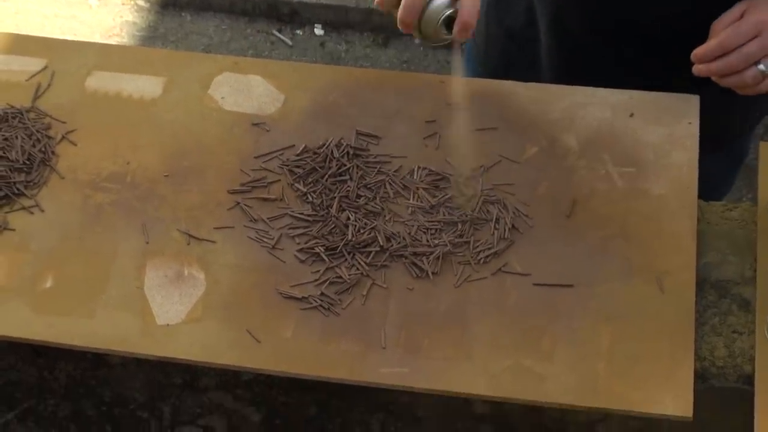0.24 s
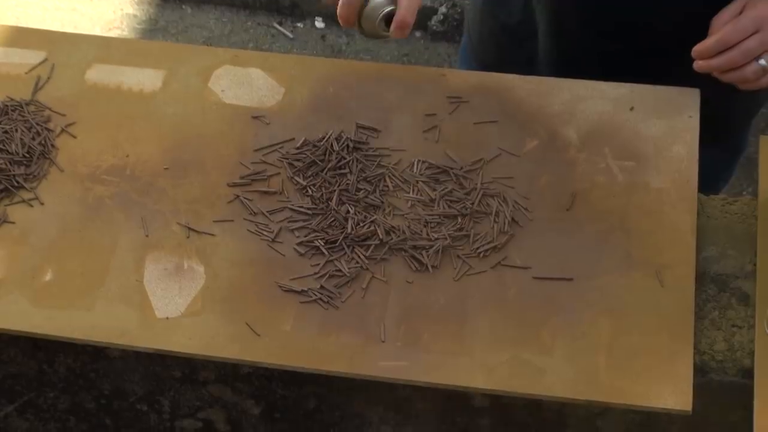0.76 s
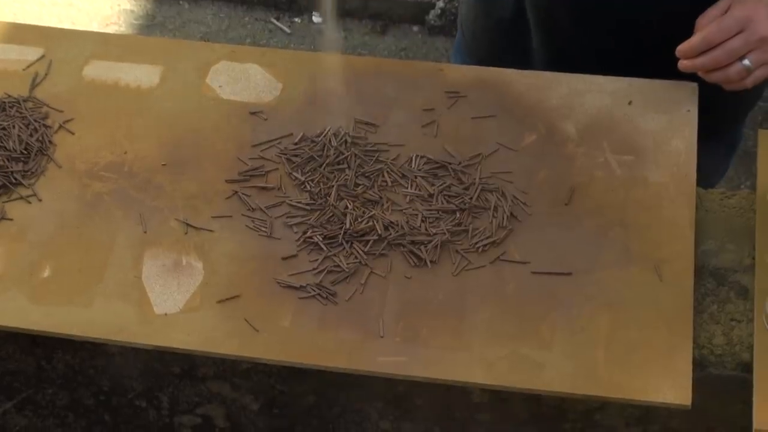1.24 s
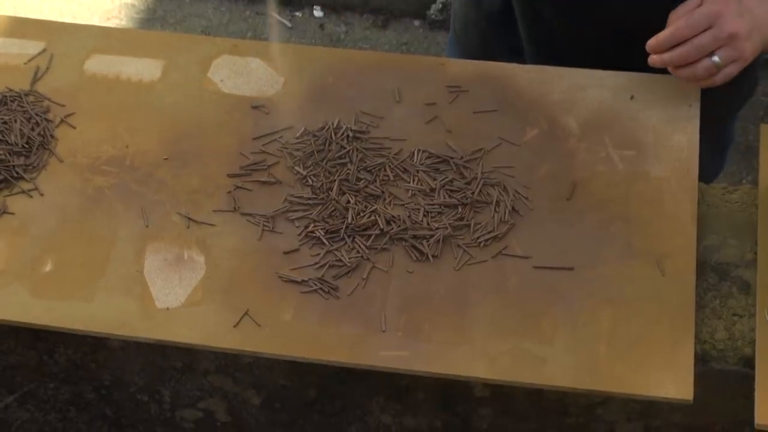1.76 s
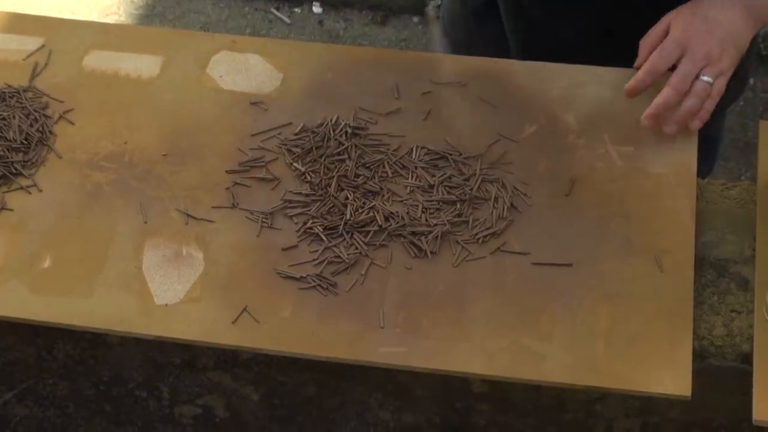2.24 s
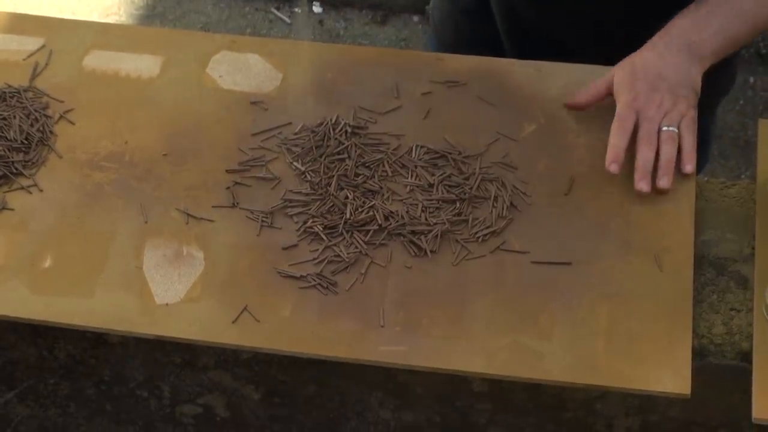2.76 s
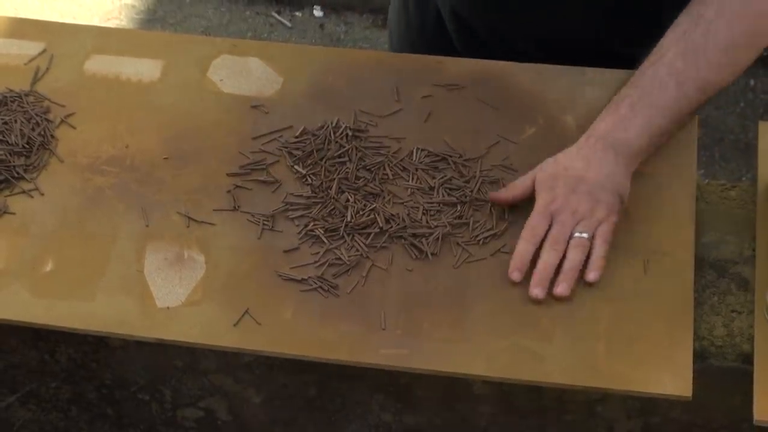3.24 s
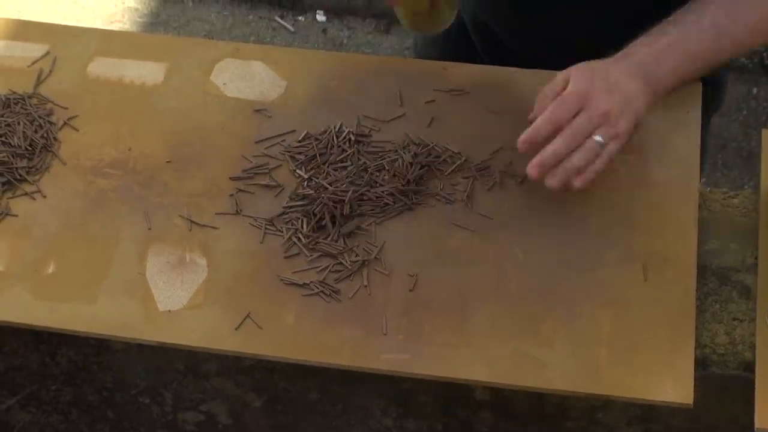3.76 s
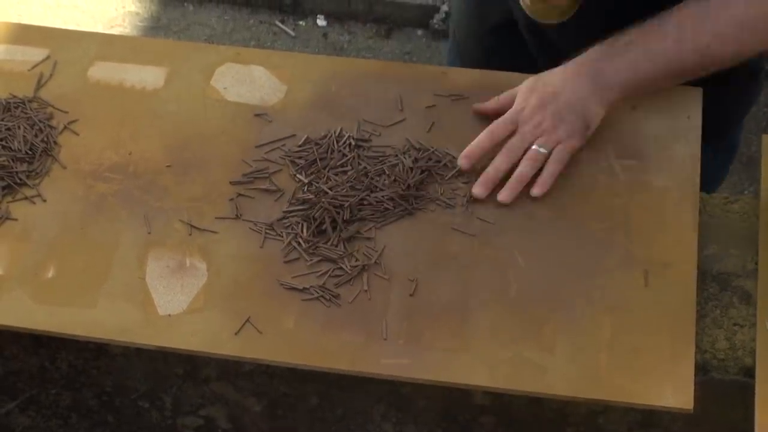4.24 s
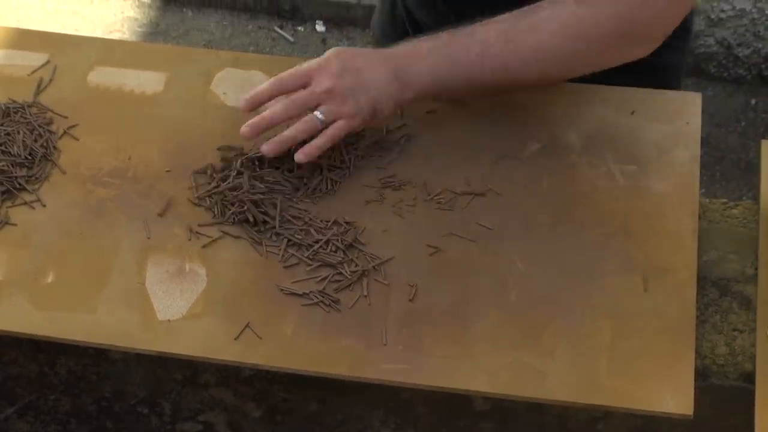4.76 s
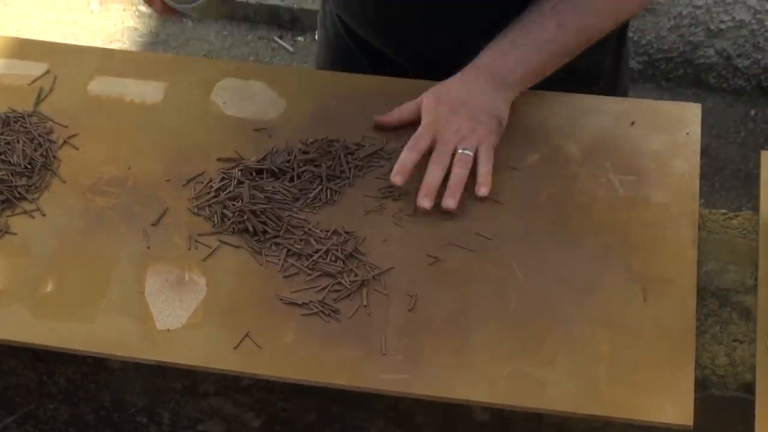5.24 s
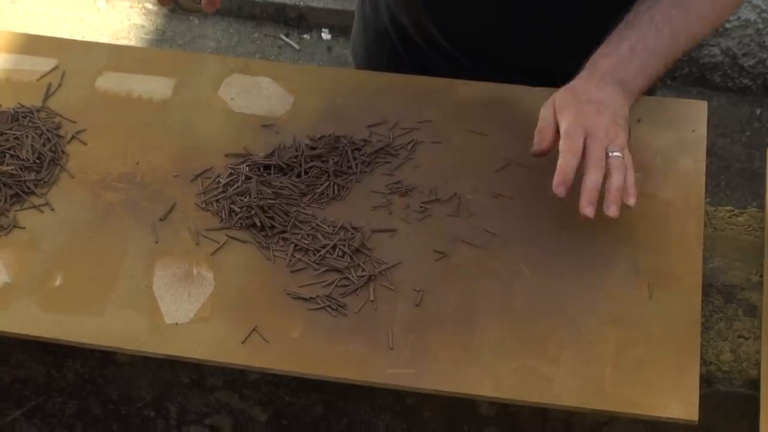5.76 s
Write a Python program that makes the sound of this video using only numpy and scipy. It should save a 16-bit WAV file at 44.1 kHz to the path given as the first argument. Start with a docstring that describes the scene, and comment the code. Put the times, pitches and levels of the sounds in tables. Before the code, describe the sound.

Short hissing aerosol bursts outdoors, then a spray can rattles with its metallic mixing ball while dry twigs are brushed across a board.

```python
"""An open yard outdoors: close to the microphone a paint can sprays short bursts over dry twigs on a board.
The spray is shaped noise, combed by echoes from the board; clots spit through the nozzle as short pops.
The can is tipped and shaken: its ball knocks decaying modes out of the wall and scrapes them as it rolls.
A hand sweeps the twigs together, in grainy noise with small snaps, and its palm rubs the board.
Far off, a street washes, with an engine tone in about the first half; a noise gate fades the pauses."""
import sys
import numpy as np
from scipy import signal
from scipy.fft import rfft, irfft
from scipy.io import wavfile
from scipy.ndimage import uniform_filter1d, map_coordinates

SR = 44100
rng = np.random.default_rng(int(sys.argv[2]) if len(sys.argv) > 2 else 0)


def transcribe(u):
    """Save the signal u as a 16-bit wav file named by the first command-line argument.

    u: samples, shape (n,) or (channels, n), limited to [-1, 1]; the rate is SR.
    q: integer samples, one column per channel.
    """
    v = np.clip(np.atleast_2d(u).T, -1, 1)
    q = np.round(v * 32767).astype(np.int16)
    wavfile.write(sys.argv[1], SR, q)


N = 264319  # length [samples]
TIME = np.arange(N) / SR  # [s]

# Levels in the tables of strokes and blows are relative: each source has its own trim in the mix.

# far street, level over time: start_s, level_db
STREET_LEVEL = [(0, -51), (.15, -57.5), (.45, -48), (.85, -54), (1.1, -49), (1.9, -49), (2.3, -48),
                (2.8, -49), (3.05, -61.5), (3.4, -65), (3.55, -48.5), (3.8, -55.5), (4.4, -56), (5.99, -48)]
# far street, spectrum: frequency_hz, density_db (per Hz)
STREET_SPECTRUM = [(25, -25), (50, -27), (90, -20), (125, -17), (150, -7.5), (180, 0.5), (320, 0),
                   (490, -5), (600, -17), (1000, -17.5), (2000, -27), (5000, -30), (16000, -48)]
# far engine pulling through its gears: start_s, firing_hz, level_db, half_order_db (over the firing tone)
ENGINE_GEARS = [(0, 215.8, -51.5, -14), (.35, 180, -57, -33), (.7, 215, -50, -19), (1.1, 172, -56.5, -21),
                (1.45, 180, -47, -10), (1.6, 206.5, -49.5, -17), (1.93, 220.3, -50, -19.5),
                (2.1, 170, -53.5, -12.5), (2.33, 176.6, -45, -13.5), (2.5, 206, -53, -17),
                (2.68, 203.5, -56.5, 4.5), (2.8, 209, -48, -23), (2.95, 205, -84, -15)]

# board under the twigs, spectrum: frequency_hz, density_db (per Hz)
BOARD_SPECTRUM = [(120, -39.5), (220, -5), (440, 1), (600, -5), (850, -0.5), (1300, -7.5), (2500, -34.5)]
# the hand leans on the heap: start_s, length_s, rise_s, sag_db_per_s, level_db
LEANS = [(3.4, 0.092, .06, 24, -37.5), (4.42, 0.18, 0.26, 9, -35.5)]
# skin on wood, spectrum: frequency_hz, density_db (per Hz)
PALM_SPECTRUM = [(60, -34), (200, 0), (450, -2), (1400, 4), (2300, -1), (3500, 3.5), (4300, 5),
                 (5900, -3.5), (6600, -12.5), (9500, -16), (11000, -27.5), (16000, -33)]
# the palm slides over the board: start_s, length_s, rise_s, sag_db_per_s, level_db
PALM_SLIDES = [(4.303, 0.099, 0.042, 49, -38), (4.41, .05, 0.061, 5.5, -28.5),
               (5.133, 0.13, 0.0038, -2.5, -60), (5.3, 0.16, 0.027, 93, -48)]
# dry twigs, spectrum: frequency_hz, density_db (per Hz)
TWIG_SPECTRUM = [(76, -59), (130, -40), (228, -9), (394, -10.5), (453, -3), (501, -13), (589, -5),
                 (638, -7.5), (1400, -3.5), (2270, -4.5), (4780, -2.5), (9670, -9.5), (12800, -17.5),
                 (15100, -16), (16000, -29)]
# the hand pushes the twigs: start_s, length_s, rise_s, sag_db_per_s, level_db, brightness_db_per_octave
TWIG_SWEEPS = [(3.19, .19, 0.012, 16, -61.5, 1), (3.385, 0.19, 0.0045, 32, -32, 0),
               (4.38, 0.29, 0.16, 14.5, -34.5, -0.63), (5.235, 0.094, 0.082, 110, -37.5, -0.56)]
DULLING = 0.1  # slower twigs sound duller: dB an octave per dB under the stroke's peak
SETTLE_PER_S, SETTLE_DB = 82, -10  # stray twigs that drop into place: rate, level before the push shapes it

# wall of the can, its modes: frequency_hz, level_db, free_t60_s (before the hand's grip shortens it)
CAN_MODES = [(1474, 3, 0.036), (1750, -4.5, .025), (2067, 4.5, .06), (2190, -6, .04), (2300, -1.5, 0.27),
             (3525, 1.5, 0.28), (4180, 1, .03), (4170, -15, .04), (4860, 2.5, .04), (5100, -21.5, 0.029),
             (5860, -5, 0.017), (6310, -2, 0.14), (6970, 1.5, .04), (7280, -1.5, .04), (7970, -11, 0.028),
             (9030, 2.5, 0.075), (9990, -10.5, 0.3)]
DAMPING_DB_PER_S = 448  # extra decay of every mode under the gripping hand
DETUNE, RING_TILT_DB = .02, -1  # spread of the modes from strike to strike; their tilt in dB an octave
# paint sloshing in the tipped can loads the wall: start_s, mode_factor (on frequency), treble_edge_hz
PAINT_LOAD = [(1.5, 0.81, 15000), (2.25, 0.99, 15000), (2.83, 1.02, 11500), (2.93, 0.98, 8500),
              (3.16, 0.94, 8500), (3.37, 1.045, 10900), (3.5, 1.02, 11600), (3.8, 1.003, 9600),
              (3.92, 1, 9000), (4.08, 0.99, 8120)]
# the ball rolls along the wall: start_s, length_s, rise_s, sag_db_per_s, level_db, brightness_db_per_octave
BALL_ROLLS = [(.09, 0.1, 0.022, 5, -52.5, -5), (1.39, 0.049, 0.01, 3, -36.5, -11),
              (3.14, 0.16, 0.02, 30.5, -39.5, -13.5), (3.29, .095, .09, 5, -34, -8.5),
              (3.63, 0.25, 0.014, 32.5, -35.5, -8), (3.91, 0.15, .005, 17, -43.5, -2),
              (4.1, 0.25, .01, 113, -51.5, -2), (5.208, 0.15, 0.02, 4.5, -47.5, -1.5)]
ROLL_WIDTH = 0.023  # half width of a scraped mode, as a share of its frequency
# the ball strikes the can, and at 2.07 s the valve clicks: start_s, crack_peak_db, body_db, # low_band_db and
# high_band_db (over the body), ping_hz (strongest note)
BALL_KNOCKS = [(1.5269, -9.5, -56.5, 24, 14, 1340), (1.5477, -9, -42.5, 15.5, 8, 1308),
               (1.695, -17.5, -54.5, 2, -2, 4260), (1.7501, -14.5, -39, 4, -5, 4170),
               (2.0697, -33, -47.5, 13, 14.5, 7400), (2.2409, -11.5, -37.5, 2, 2, 7120),
               (2.2695, -16.5, -45.5, 10, 5, 1572), (2.289, -17, -40, 5, 3, 1670),
               (2.7781, -12, -41, 3.5, 0, 1670), (2.8065, -14, -32.5, 1.5, 7, 1580),
               (2.8238, 5.5, -37, 0.5, 7, 6380), (2.9203, -8, -44, 8, 2, 1726),
               (2.9447, -11.5, -36.5, 3, -7, 1700), (2.9627, -10.5, -35, 4.5, 4, 1690),
               (3.1594, -13.5, -48.5, 5, 4, 1730), (3.3877, 0.5, -22.5, 2, -5, 2010),
               (3.3989, 0, -26.5, -2.5, 4.5, 6820), (3.4064, -1.5, -22.5, -2.5, 1, 3720),
               (3.4204, -4.5, -27, 1, -11.5, 2010), (3.4562, -14.5, -22, 3, 1.5, 3596),
               (3.5005, -0.5, -26, 3.5, 2.5, 1960), (3.5543, -26, -19.5, 2.5, -3, 2027),
               (3.5664, -4, -24, 2.5, -10.5, 2077), (3.639, -14.5, -31.5, 4.5, -14.5, 1990),
               (3.6575, -11, -32, 2, 4.5, 2420), (3.6713, -6.5, -28, 1, 4, 6900),
               (3.7074, -18, -33, 5, 2.5, 2014), (3.7389, -18, -42, 6, 6, 2030),
               (3.7628, -28, -31, 1.5, -7.5, 2040), (3.7988, -16, -43.5, -4, 1.5, 2130),
               (3.91, -19, -31.5, -4, 7.5, 2140), (3.9314, -38, -32, -1, 3.5, 2160),
               (4.0776, -10, -27, -3, 6.5, 1953), (4.1154, -17.5, -40, -6, -2, 1970),
               (5.2114, -41, -49.5, -19, 9, 6370), (5.241, -29, -42, -14, -3, 6360)]
# crack of a strike, spectrum: frequency_hz, density_db (per Hz)
CRACK_SPECTRUM = [(40, -46), (200, -30.5), (800, 5), (1900, -6.5), (3600, 0), (7000, 4), (10000, -3),
                  (12000, -8.5), (16000, -16.5)]
REBOUND_S, REBOUND_DB, RING_DB = .012, -7.5, 0  # longest hop, its level; the modes over the clatter

# a clot spits: start_s, crack_peak_db, body_db, low_band_db and high_band_db (over the body)
NOZZLE_SPITS = [(0.9582, -2.5, -13, -26, -10), (0.9864, -21, -31.5, 10, 7), (1.2343, -9, -13, -18, -17.5),
                (5.8561, -23, -28.5, 8.5, 21)]
# spitting nozzle, spectrum: frequency_hz, density_db (per Hz)
SPIT_SPECTRUM = [(300, -27), (1000, -26.5), (1800, -19.5), (2400, -22), (3200, -6), (4200, 7.5),
                 (5300, 0.5), (6700, 6.5), (8000, -6.5), (12000, -2.5), (16000, -15)]
# presses of the valve: start_s, length_s, rise_s, sag_db_per_s, jet_db,
# then over the jet: low_treble_db, cap_resonance_db, mist_on_board_db
VALVE_BURSTS = [(0.0, 0.056, 0.00067, 66, -30.5, 6, 2, -11.5), (.219, 0.14, 0.076, 65, -27, -.5, -6, -13),
                (.446, 0.15, 0.083, 68, -28, -1.5, -5, -16), (.636, .15, 0.071, 58, -30.5, -0.5, -2, -17.5),
                (.826, 0.16, 0.12, 45, -30.5, -0.5, -1, -12), (1.04, .15, 0.081, 67, -33, 4, 3, -9.5),
                (1.25, 0.24, 0.078, 57, -30.5, -2, -1.5, -11.5),
                (1.5, .157, 0.062, 81, -32, 6.5, -0.5, -5.5), (1.697, 0.036, .002, 150, -44, 6, 0, 3),
                (1.73, 0.11, 0.051, 86, -34.5, 7.5, 0.5, -2), (2.069, 0.16, 0.055, 128, -31.5, 2, -1, -4.5),
                (2.25, 0.17, 0.097, 105, -43, 13, 10.5, 4.5), (2.505, 0.14, 0.089, 62, -33.5, 0, -3.5, -29),
                (2.672, 0.19, 0.086, -10, -40.5, 6.5, -3.5, -37),
                (2.9, 0.29, 0.11, 47, -28, 0.5, -6, -13.5), (5.589, 0.14, 0.11, 1, -33.5, -2, -9.5, -24),
                (5.81, .15, 0.11, 130, -27.5, 3, -5.5, -12)]
# echo of the board, following the height of the can: start_s, lag_ms
BOARD_LAG = [(0, 1.03), (.06, 1.07), (.22, 0.98), (.43, 0.96), (.54, 1.1), (.72, 1.05), (.85, 1.11),
             (.97, 1.12), (1.2, 1), (1.3, 0.99), (1.75, 0.97), (1.85, 0.96), (2.07, 0.845), (2.26, 0.83),
             (2.42, 0.97), (2.66, 1.23), (3.12, 1.05), (5.66, 0.93), (5.96, 1.25)]
# nozzle jet, spectrum: frequency_hz, density_db (per Hz)
JET_SPECTRUM = [(4300, -32.5), (5400, -7.5), (6700, -2), (7400, -5), (8200, -0.5), (9000, -9.5),
                (10200, 1.5), (11500, 3.5), (13000, 5), (14500, 4), (15800, -2.5)]
# resonance of the nozzle cap, spectrum: frequency_hz, density_db (per Hz)
CAP_SPECTRUM = [(2350, -39), (2600, -13), (2950, -6), (3350, 1), (3700, -1.5), (4150, 0), (4500, -5.5),
                (4900, -17), (5600, -33.5)]
# mist landing on the board, spectrum: frequency_hz, density_db (per Hz)
MIST_SPECTRUM = [(250, -41), (500, -3), (800, -0.5), (1050, -7), (1300, -3), (1750, 2.5), (2000, -7.5),
                 (2300, -16), (3200, -38)]

# noise gate behind the microphone: threshold, dB of cut per dB under it, closing speed
GATE_DB, GATE_SLOPE, GATE_CLOSE_DB_PER_S = -55, 3.9, 97
EDGE_HZ = 15950  # upper band limit


def amp(db):
    """Decibels to gain."""
    return 10 ** (np.asarray(db) / 20)


def unit(x):
    """Scales to rms 1."""
    return x / np.sqrt(np.mean(x ** 2) + 1e-20)


def add(mix, s, sound):
    """Mixes a sound in at a time in seconds."""
    part = mix[max(round(s * SR), 0):][:len(sound)]
    part += sound[:len(part)]


def colour(x, spectrum):
    """Filters by a spectrum of (Hz, dB) points, joined over log frequency; rms 1."""
    hz, db = np.transpose(spectrum)
    f = np.fft.rfftfreq(len(x), 1 / SR)
    gain = amp(np.interp(np.log(f + 1), np.log(hz), db))
    return unit(irfft(rfft(x) * gain, len(x)))


def hiss(spectrum, length=N):
    """Coloured noise of rms 1."""
    return colour(rng.standard_normal(length), spectrum)


def puff(t, spectrum, rise_s):
    """Noise that swells and dies within a few milliseconds."""
    return hiss(spectrum, len(t)) * t * np.exp(-t / rise_s)


def waver(per_s):
    """Smooth random drift of rms 1, slower than about the given rate."""
    f = np.fft.rfftfreq(N, 1 / SR)
    return unit(irfft(rfft(rng.standard_normal(N)) / (1 + (f / per_s) ** 4), N))


def delayed(x, lag_ms, order=3):
    """The sound after a fixed or moving path delay, interpolated between samples."""
    return map_coordinates(x, [np.arange(N) - lag_ms * SR / 1000], order=order)


def curve(rows, column):
    """One column of a curve, joined over time."""
    rows = np.array(rows)
    return np.interp(TIME, rows[:, 0], rows[:, column])


def held(events, column):
    """One column of an event table, kept until the next event starts."""
    rows = np.array(events)
    latest = np.maximum(np.searchsorted(rows[:, 0], TIME) - 1, 0)
    return rows[latest, column]


def level(strokes, onset_db, release_db_per_s):
    """Gain of a series of strokes: each starts softly, swells, sags after its rise and is released."""
    out, t = np.zeros(N), TIME[:SR]
    for start, length, rise, sag, db, *_ in strokes:
        swell_db = onset_db * np.maximum(1 - t / rise, 0) ** 2
        fall_db = sag * np.maximum(t - rise, 0) + release_db_per_s * np.maximum(t - length, 0)
        fade_in = np.minimum(t / .003, 1)
        add(out, start, amp(db + swell_db - fall_db) * fade_in)
    return out


def street():
    """Far off: low traffic wash and one wavering engine note with its half orders, until its last row."""
    firing_hz = curve(ENGINE_GEARS, column=1) * (1 + 0.034 * waver(27))
    turn = 2 * np.pi * np.cumsum(firing_hz) / SR
    half_order = amp(curve(ENGINE_GEARS, column=3)) * np.sin(turn / 2)
    engine = np.sin(turn) + half_order + .3 * np.sin(3 * turn / 2)
    engine *= amp(curve(ENGINE_GEARS, column=2) + 3.4 * waver(22)) * (TIME < ENGINE_GEARS[-1][0])
    wash = amp(curve(STREET_LEVEL, column=1)) * hiss(STREET_SPECTRUM)
    return wash + engine


def yard(x):
    """Adds faint scatter from the walls and ground around, as a decaying tail of noise."""
    t = TIME[:SR // 3]
    tail = hiss([(200, 13.0), (4000, 2.5), (9000, -2), (16000, -24.0)], len(t))
    tail *= amp(-60 * t / 0.28) * (t > .006)
    return x + amp(-15.0) * signal.oaconvolve(x, tail / np.linalg.norm(tail))[:N]


def board():
    """Grainy rumble of the board under the twigs that are pressed onto it."""
    rumble = hiss(BOARD_SPECTRUM) * amp(2.0 * waver(110))
    return rumble * level(LEANS, onset_db=-10, release_db_per_s=149)


def palm():
    """Dull rub of skin on wood, combed by the gap under the hand."""
    rub = hiss(PALM_SPECTRUM) * amp(2.2 * waver(90))
    combed = unit(rub + 0.25 * delayed(rub, 1.31, order=1))
    return level(PALM_SLIDES, onset_db=-23.5, release_db_per_s=264) * combed


def settling():
    """Single twigs tick against the board during and after each push."""
    drops = rng.standard_normal(N) * (rng.random(N) < SETTLE_PER_S / SR)
    tick = puff(TIME[:SR // 50], [(500, -21), (2500, -0.5), (9000, 3), (16000, -14)], rise_s=0.0003)
    ticks = unit(signal.oaconvolve(drops, tick)[:N])
    return amp(SETTLE_DB) * ticks * level(TWIG_SWEEPS, onset_db=-21.5, release_db_per_s=100)


def sweeps():
    """Twigs skid over the board in a dense rub, with many tiny snaps."""
    snap_gain = amp(3.5 * np.minimum(rng.exponential(1, N), 3))
    snaps = rng.standard_normal(N) * snap_gain * (rng.random(N) < 2500 / SR)  # 2500 a second
    rub = colour(unit(snaps) + 1.9 * rng.standard_normal(N), TWIG_SPECTRUM) * amp(0.58 * waver(45))
    _, t, z = signal.stft(rub, SR, nperseg=256)
    # each twig has its own note: random patches over frequency and time
    patches = uniform_filter1d(rng.standard_normal(z.shape), size=3, axis=0)
    patches = unit(uniform_filter1d(patches, size=14, axis=1))
    push = level(TWIG_SWEEPS, onset_db=-21, release_db_per_s=150)
    over_peak_db = 20 * np.log10(push + 1e-6) - held(TWIG_SWEEPS, column=4)
    brightness = held(TWIG_SWEEPS, column=5) + DULLING * over_peak_db
    octaves = np.log2(np.fft.rfftfreq(256, 1 / SR).clip(400) / 800)
    z *= amp(octaves[:, None] * np.interp(t, TIME, brightness) + 1.7 * patches)
    return amp(6.5) * push * signal.istft(z, SR)[1][:N]


def cushion(hz, edge_hz):
    """A film of paint takes off most of the treble above an edge."""
    return amp(-22) + 1 / (1 + (hz / edge_hz) ** 20)


def rolling():
    """The rolling ball scrapes the wall's modes into a rough whirr that glides as the paint shifts."""
    rough = rng.standard_normal(N) * amp(2 * waver(90))
    f, t, z = signal.stft(rough, SR, nperseg=1024)
    f = f[:, None]
    factor, edge_hz = (np.interp(t, TIME, curve(PAINT_LOAD, k)) for k in (1, 2))
    wall_power = amp(-36)  # floor between the modes
    for hz, db, _ in CAN_MODES:
        offset = (f - hz * factor) / (ROLL_WIDTH * hz)
        wall_power = wall_power + amp(db) ** 2 / (1 + offset ** 2) ** 2
    brightness = np.interp(t, TIME, held(BALL_ROLLS, column=5))
    tilt = amp(brightness * np.log2(f.clip(2000) / 2000))
    shape = np.sqrt(wall_power) * tilt * cushion(f, edge_hz)
    whirr = signal.istft(z * shape / np.linalg.norm(shape, axis=0), SR)[1][:N]
    whirr = colour(whirr, [(50, -21.5), (500, -0.5), (16000, -2.5)])
    return amp(-2.5) * level(BALL_ROLLS, onset_db=-22, release_db_per_s=497.5) * whirr


def can_ring(t, factor):
    """The wall's modes, decaying, weighted and detuned by where the ball lands."""
    hz, db, t60 = np.transpose(CAN_MODES)[:, :, None]
    place, detune, phase = rng.standard_normal((3, len(CAN_MODES), 1))
    strength_db = db + 4 * place + RING_TILT_DB * np.log2(hz / hz[0])
    decay_db = (60 / t60 + DAMPING_DB_PER_S) * t
    tones = np.sin(2 * np.pi * (hz * factor * (1 + DETUNE * detune) * t + phase))
    return (amp(strength_db - decay_db) * tones).sum(0)


def balance(x, body_db, low_db, high_db):
    """Sets the strength of a blow's first milliseconds in its low, middle and high band."""
    bands = [((600, 2750), "band", low_db), ((2700, 5500), "band", 0), (5500, "high", high_db)]
    padded, out = np.pad(x, (64, 0)), 0
    for hz, kind, db in bands:
        sos = signal.butter(4, hz, kind, fs=SR, output="sos")
        part = signal.sosfiltfilt(sos, padded, padtype=None)
        out = out + amp(body_db + db) * part / part[64:420].std()
    return out[44:]  # keeps a little of the filters' soft onset


def blow(row, crack, tail, crack_db, tail_db):
    """A short crack, then whatever rings on."""
    peak_db, *tone = row[1:5]
    swell = 1 - np.exp(-TIME[:len(tail)] / 0.00083)  # the ring takes a moment to spread
    crack = balance(crack, *tone)
    crack = amp(peak_db + crack_db) * crack / abs(crack).max()
    return crack + amp(tail_db) * balance(tail * swell, *tone)


def knocks():
    """Each strike of the ball: a clack, a dense clatter of thin steel, the wall's modes, a soft rebound."""
    out, t = np.zeros(N), TIME[:8192]
    hz = np.fft.rfftfreq(len(t), 1 / SR)
    factor, edge_hz = curve(PAINT_LOAD, column=1), curve(PAINT_LOAD, column=2)
    radiation = hz ** 2 / (hz ** 2 + 350 ** 2)  # a small can radiates little bass
    for row in BALL_KNOCKS:
        at = round(row[0] * SR)
        # the spot that is hit favours one note
        ping = amp(8.5 - 60 * t / 0.095) * np.sin(2 * np.pi * row[5] * t)
        ring = can_ring(t, factor[at]) + ping
        clack = unit(puff(t, CRACK_SPECTRUM, rise_s=.0009))
        clack += amp(2) * unit(ring * t * np.exp(-t / .001))
        clack += amp(0.5) * unit(ping * t * np.exp(-t / 0.00065))
        flutter = unit(uniform_filter1d(rng.standard_normal(len(t)), size=90))
        clatter = hiss(CRACK_SPECTRUM, len(t)) * amp(-60 * t / 0.074 + 2 * flutter)
        sound = blow(row, clack, clatter + amp(RING_DB) * ring, crack_db=-8.5, tail_db=-7.5)
        sound = irfft(rfft(sound, len(t)) * cushion(hz, edge_hz[at]) * radiation)
        add(out, row[0], sound)
        add(out, row[0] + REBOUND_S * rng.uniform(.5, 1), amp(REBOUND_DB) * sound)
    return out


def spits():
    """Clots of paint pop through the nozzle and sputter briefly."""
    out, t = np.zeros(N), TIME[:SR // 5]
    for row in NOZZLE_SPITS:
        sputter = hiss(SPIT_SPECTRUM, len(t)) * amp(-60 * t / 0.16)
        pop = puff(t, SPIT_SPECTRUM, rise_s=0.00033)
        add(out, row[0], blow(row, pop, sputter, crack_db=-1, tail_db=-16.5))
    return out


def jet():
    """Turbulent nozzle hiss; a half-pressed valve throws a coarser jet with more low treble."""
    whole = hiss(JET_SPECTRUM)
    coarse = signal.sosfiltfilt(signal.butter(4, 9700, fs=SR, output="sos"), whole)
    fine = (whole - coarse) * level(VALVE_BURSTS, onset_db=-24, release_db_per_s=1046)
    coarse = coarse * amp(held(VALVE_BURSTS, column=5))
    return fine + coarse * level(VALVE_BURSTS, onset_db=-22.5, release_db_per_s=901.5)


def spray():
    """A turbulent jet, the cap's resonance and the mist; echoes comb the hiss as the can moves."""
    cap = hiss(CAP_SPECTRUM) * amp(held(VALVE_BURSTS, column=6) - 3.0)
    cap *= level(VALVE_BURSTS, onset_db=-20.5, release_db_per_s=800.5)
    mist = hiss(MIST_SPECTRUM) * amp(held(VALVE_BURSTS, column=7) - 2.7)
    mist *= level(VALVE_BURSTS, onset_db=-14, release_db_per_s=346.5)
    source = (jet() * amp(0.5) + cap + mist) * amp(1.3 * waver(120))
    heard = source + .76 * delayed(source, curve(BOARD_LAG, column=1))
    for near_ms, gain in [(.5, 0.34), (.74, 0.27)]:  # hand and can throw back weaker, unsteady echoes
        heard = heard + gain * delayed(heard, near_ms * (1 + .08 * waver(2.5)))
    return amp(-3.5) * heard


def scene():
    """Can, twigs and board close by in the yard, the street far off."""
    twigs_and_board = board() + palm() + settling() + sweeps()
    can = rolling() + knocks() + spits() + spray()
    return (yard(twigs_and_board + can) + street())[None]


def gate(x):
    """Noise gate: opens at once when the treble rises, and closes slowly in the pauses."""
    treble = signal.sosfilt(signal.butter(2, 2000, "high", fs=SR, output="sos"), x)
    treble_db = 10 * np.log10(abs(uniform_filter1d(treble ** 2, size=300)) + 1e-12)
    wanted_db = GATE_SLOPE * np.minimum(treble_db - GATE_DB, 0)
    fall = GATE_CLOSE_DB_PER_S * TIME
    return x * amp(np.maximum.accumulate(wanted_db + fall) - fall)


def record(dry):
    """The recorder gates the pauses and rounds off the loudest peaks; then its band limit."""
    rounded = .6 * np.tanh(gate(dry[0])[None] / .6)
    band_limit = signal.firwin(401, EDGE_HZ, window=("kaiser", 8), fs=SR)
    return signal.oaconvolve(rounded, band_limit[None], "same")


dry = scene()
out = record(dry)
transcribe(out)
```